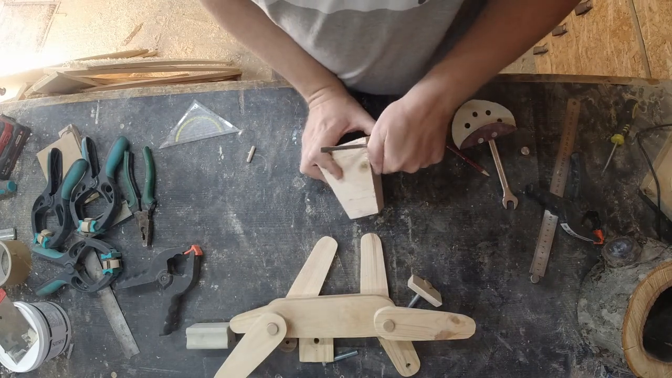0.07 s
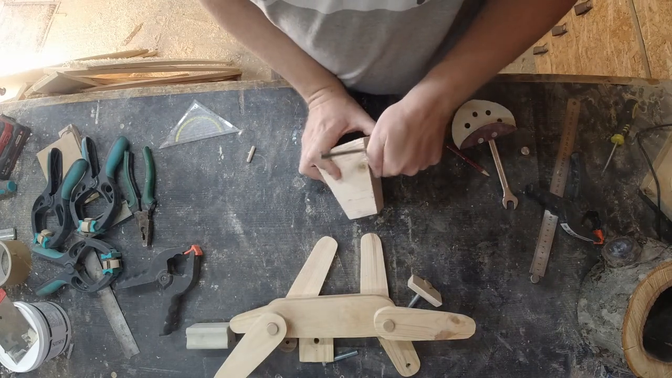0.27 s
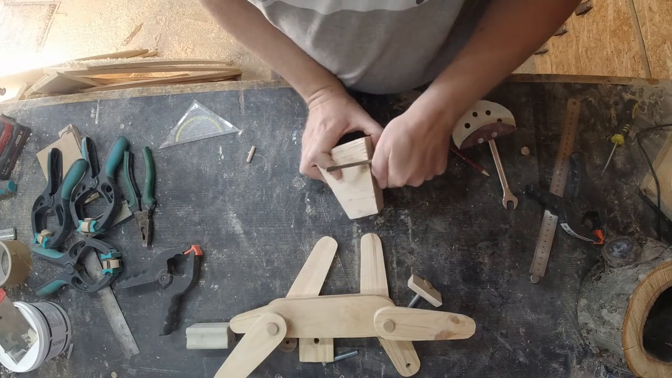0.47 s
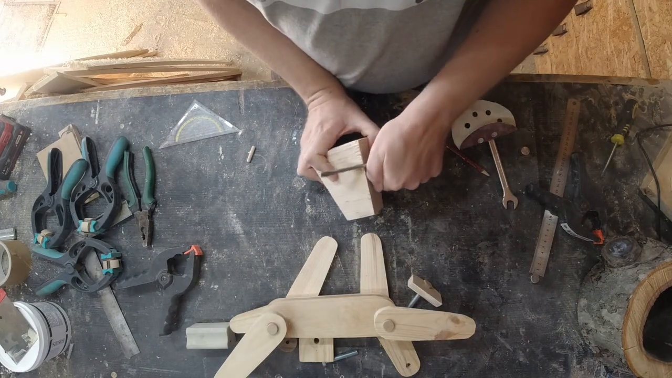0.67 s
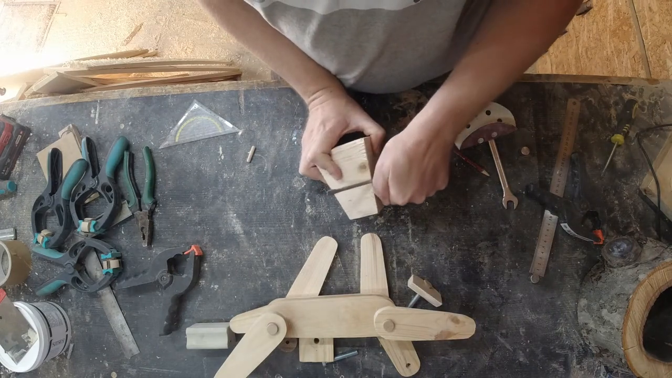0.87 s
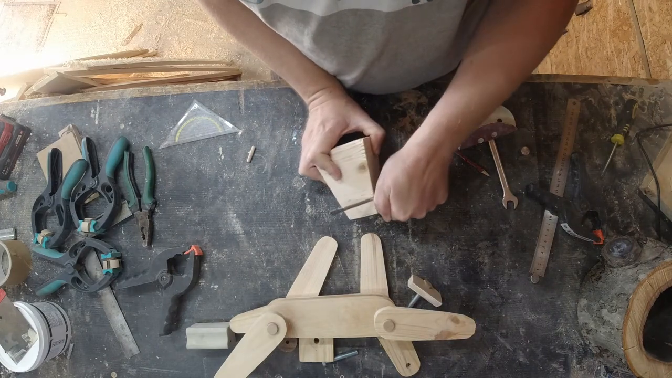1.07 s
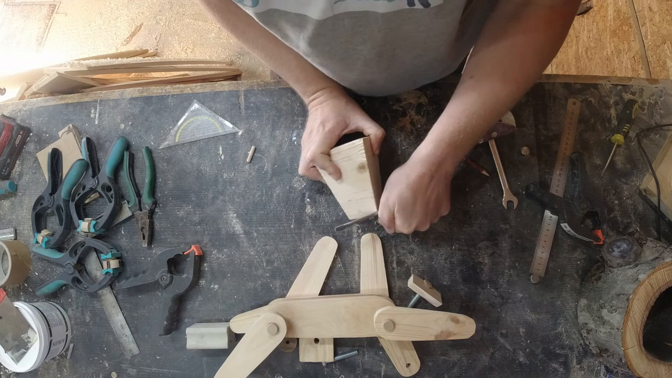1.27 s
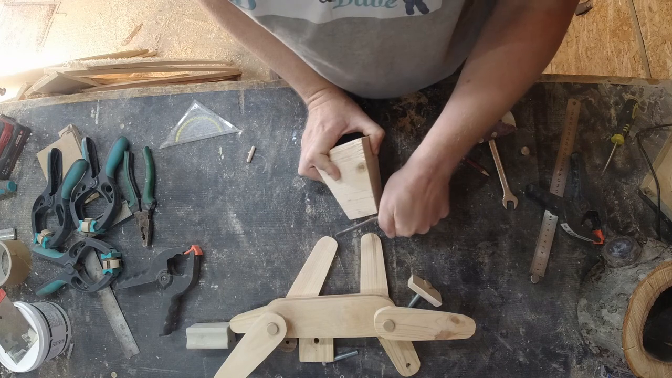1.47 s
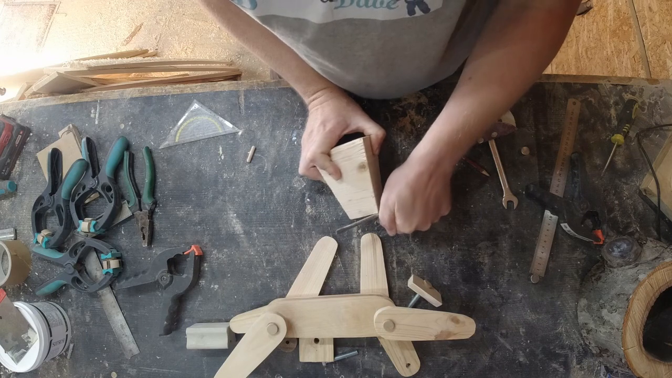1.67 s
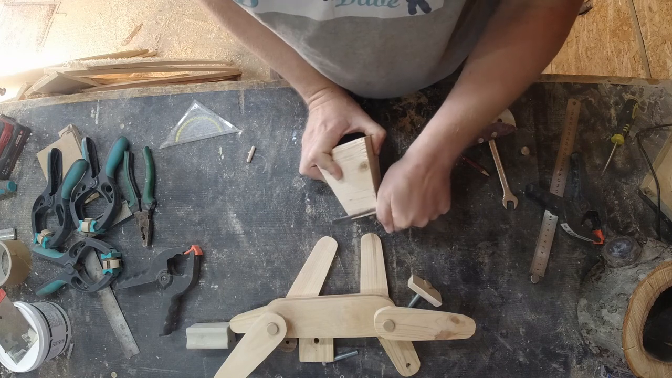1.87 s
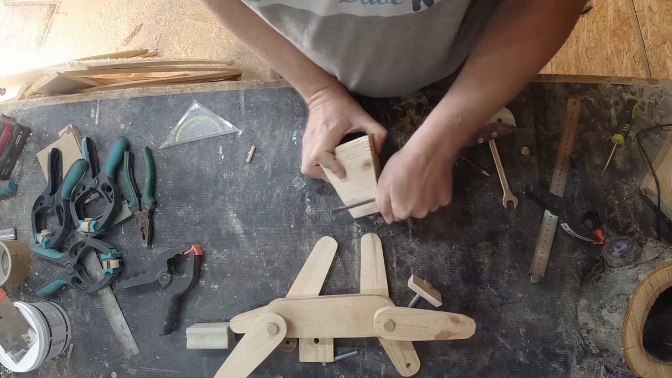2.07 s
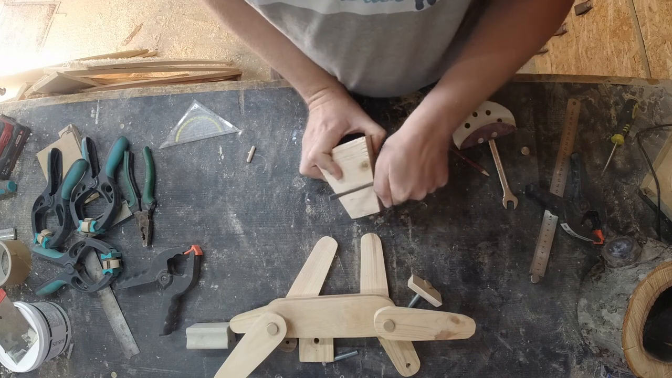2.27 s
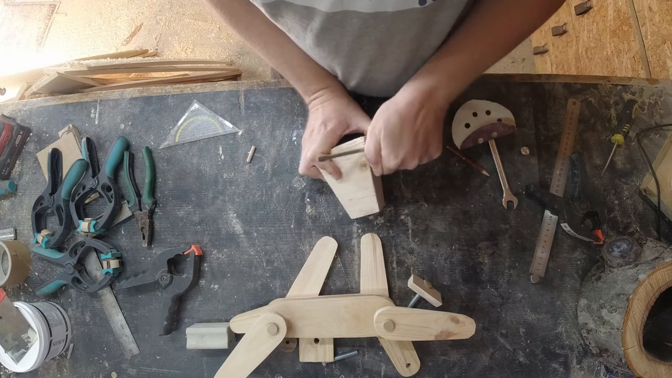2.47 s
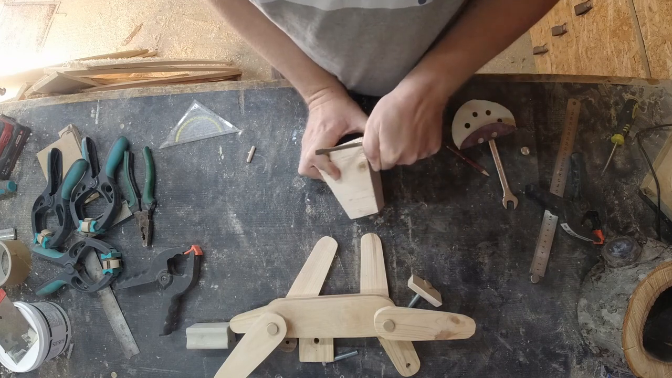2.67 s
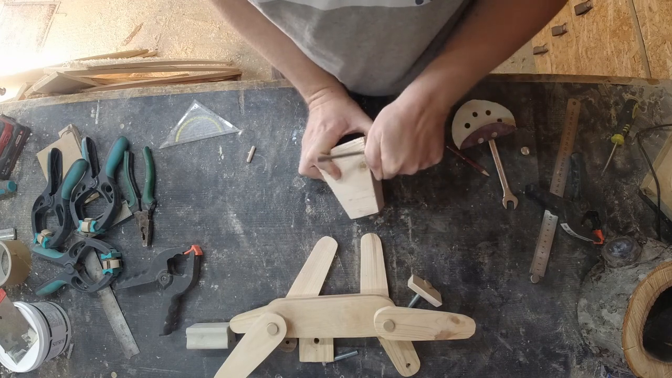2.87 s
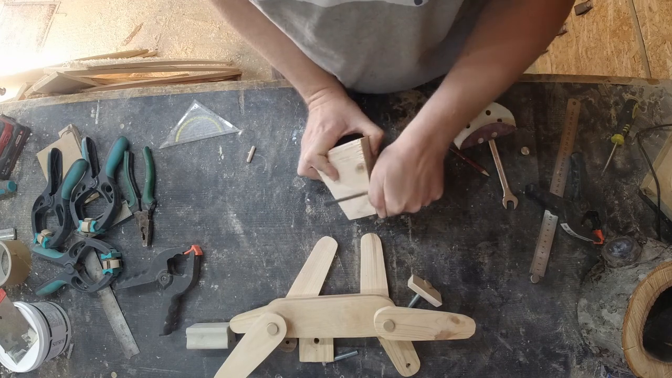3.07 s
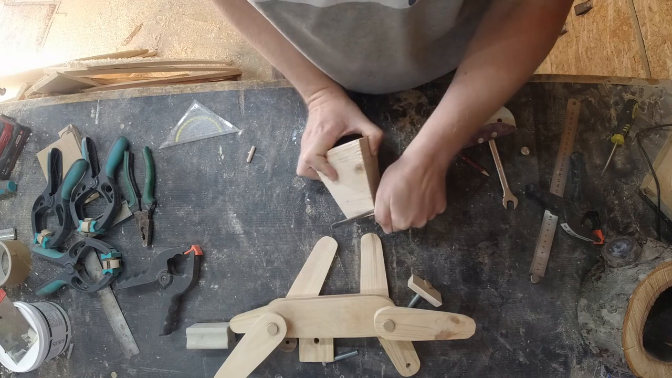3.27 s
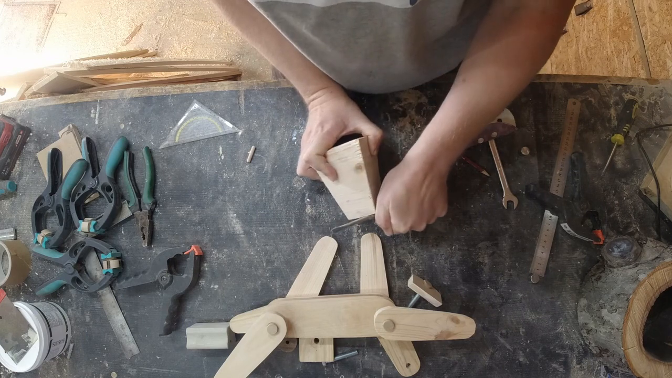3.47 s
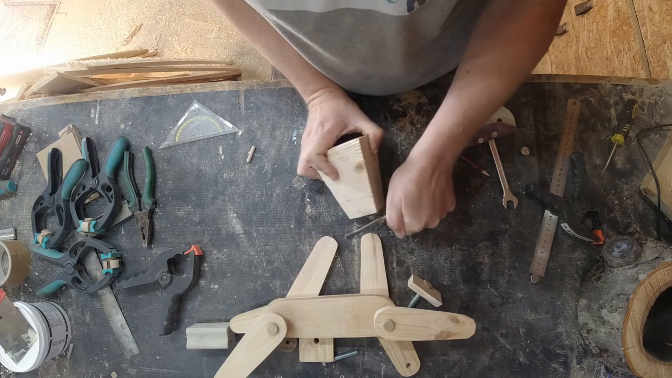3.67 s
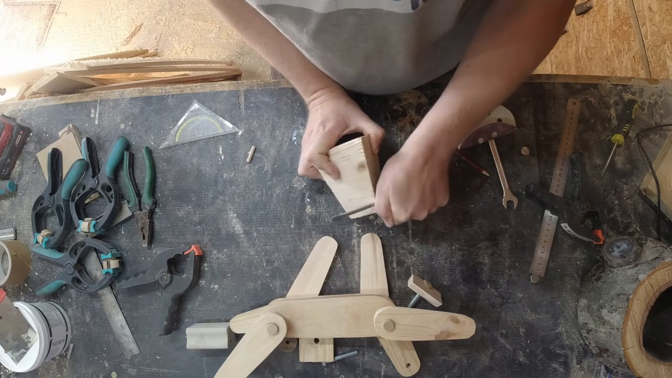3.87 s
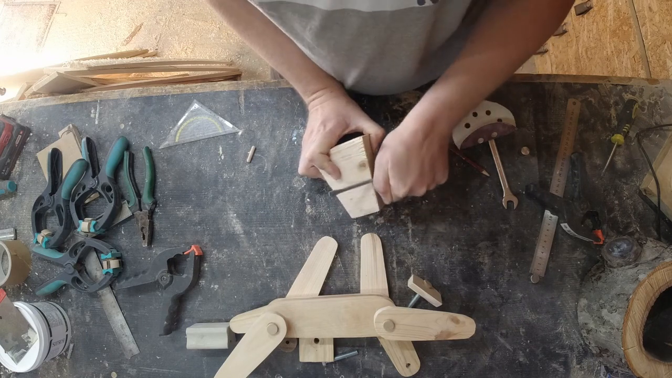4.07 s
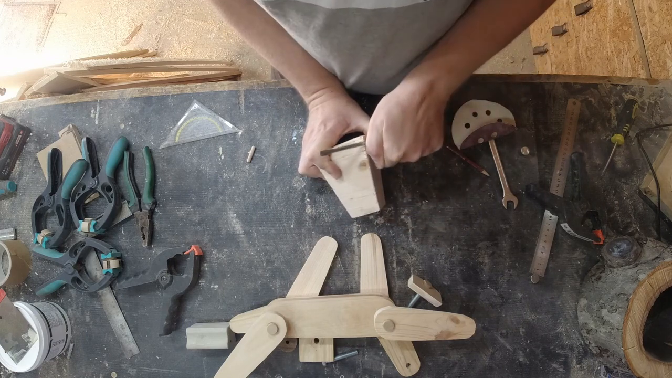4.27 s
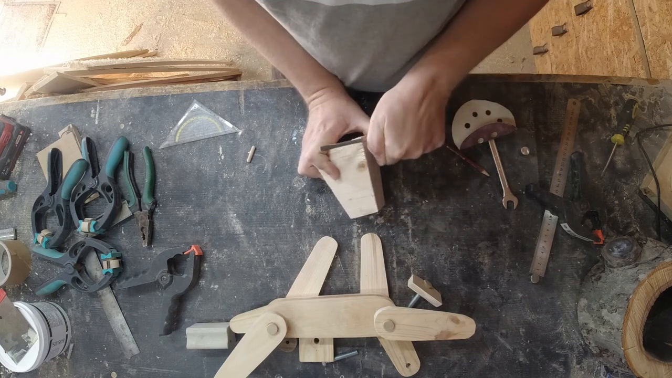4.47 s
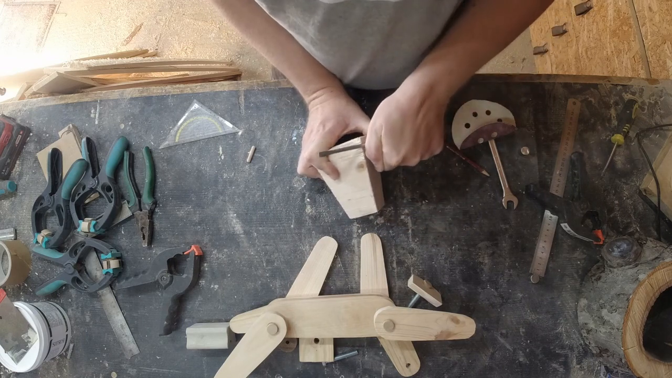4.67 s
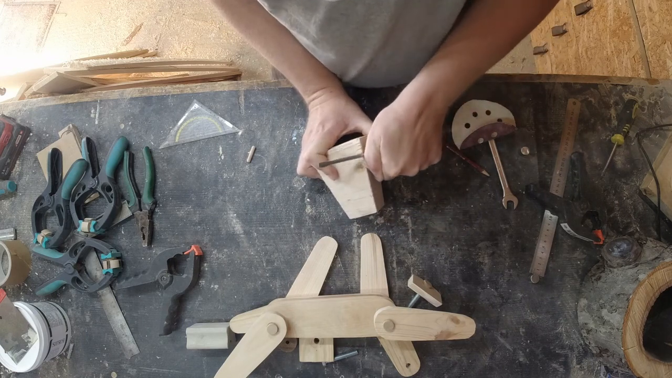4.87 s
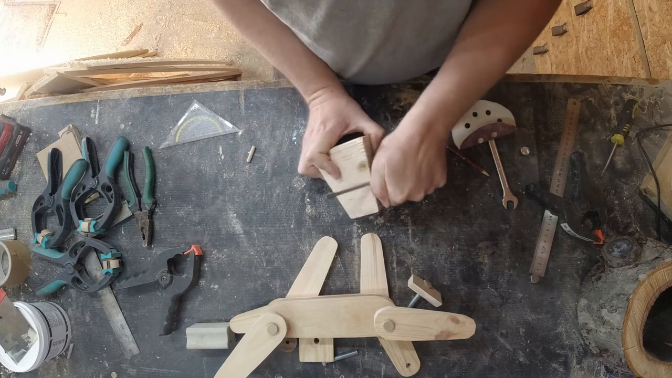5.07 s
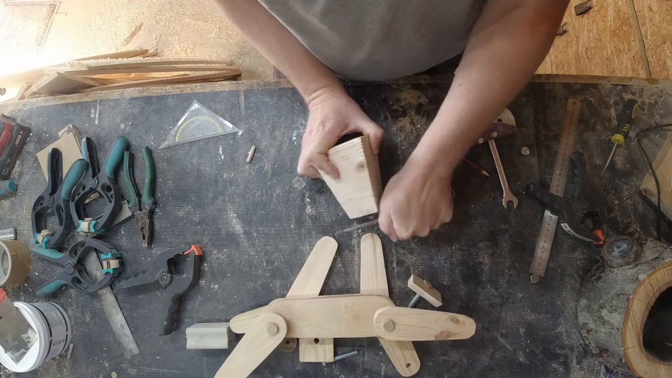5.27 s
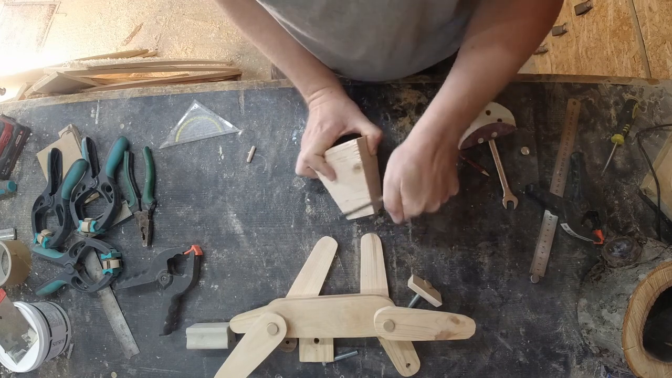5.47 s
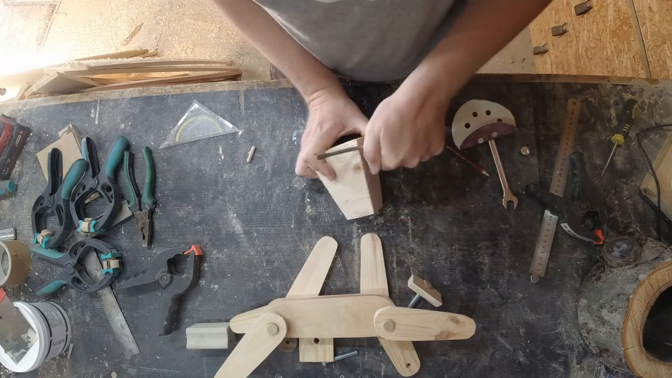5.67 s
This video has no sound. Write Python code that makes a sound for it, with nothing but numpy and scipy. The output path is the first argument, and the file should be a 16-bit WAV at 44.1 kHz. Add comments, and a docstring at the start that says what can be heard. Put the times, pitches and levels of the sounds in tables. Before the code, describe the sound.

In a small quiet workshop, a hand file scrapes a wooden block in brief, uneven rasps. The block knocks woodenly on the bench in irregular clusters, with low thuds beneath and three soft, deep bumps. A faint steel tap comes at the very end. Close microphone, nearly dry, work centred, soft room rumble and hiss behind.

```python
"""A small hand file works over a wooden block on a bench, close by, in a small quiet workshop.
From the start, uneven strokes rasp, hiss and judder as random cuts and catches excite block and bench.
Soon the block knocks on the bench top: bands of decaying modes and noise make knock, thud and tick.
From 1.5 s three soft fist bumps wake mostly low modes; from 2 s the blade sings thinly three times.
Near the end the steel file taps once and rings, with a dry rattle. Filtered noise is the room tone throughout."""
import sys
import numpy as np
from scipy import signal
from scipy.fft import rfft, irfft
from scipy.io import wavfile
from scipy.ndimage import uniform_filter1d

SR = 44100
rng = np.random.default_rng(int(sys.argv[2]) if len(sys.argv) > 2 else 0)


def digitize_waveform(pressure):
    """Quantize a signal to 16-bit integers and store it at the path in sys.argv[1].

    Rows of a 2-D input are taken as channels; values are limited to [-1, 1].
    """
    field = np.atleast_2d(pressure).T
    bounded = np.clip(field, -1, 1)
    quanta = np.round(bounded * 32767).astype(np.int16)
    wavfile.write(sys.argv[1], SR, quanta)


N = 252252
T = np.arange(N) / SR

# modes of the bench top and the block on it: f/Hz, relative height/dB, t60/s
BENCH_MODES = [(54.8, -7, 0.064), (70.1, -9, 0.46), (120.9, -1, 0.26), (155.3, -15.5, 0.049),
               (174.4, -12.5, 0.13), (196, -24.5, 0.11), (283.6, -9.5, 0.15), (385.8, -13, 0.12),
               (494.4, -23, 0.12), (539.4, -16.5, 0.061), (608, -26.5, 0.18), (666, -23, 0.16),
               (693, -24.5, 0.051), (853.5, -16.5, 0.11), (979.6, -23.5, 0.09), (1009, -30, 0.035),
               (1162, -22.5, 0.17), (1351, -27, 0.13), (1579, -36.5, 0.23), (2030, -25.5, 0.084),
               (2216, -26, 0.045), (2403, -27.5, 0.025), (2585, -26.5, 0.091), (2704, -19.5, 0.24),
               (3280, -36.5, 0.042), (4040, -42, 0.031)]


def filing():
    """Teeth cut in quick catches; each catch also shakes the block and rocks the bench top."""
    # file on the block: t/s, place (0 near end, 1 far end)
    place_points = [(.25, 0.15), (1.0, 0.71), (1.3, 1), (2.0, 1), (2.4, 0.55), (2.6, 0.13), (3.0, 0.04),
                    (3.3, 1), (3.6, 0.6), (4.0, 0.97), (4.3, 0.13), (4.55, 0.58), (5.0, 0.22), (5.3, 0.96)]
    # block resonances under the teeth: f/Hz, width/Hz, gain at near end/dB, gain at far end/dB
    block_resonances = [(2200, 120, -4.5, -14), (2670, 130, 11, -16.5), (3600, 220, -42, -1.5),
                        (4080, 1500, -17.5, -9.5)]
    # colour of the teeth on the wood: f/Hz, gain/dB
    rasp_colour = [(600, -20), (1100, -9), (1500, 2), (1900, 0), (2350, 3), (2850, 4), (3400, -1.5),
                   (3850, -12), (4250, 4.5), (4750, -5), (5200, -17.5), (5850, -12.5), (6800, -24.5),
                   (12000, -56.5)]
    # colour of the tearing fibres: f/Hz, gain/dB
    hiss_colour = [(3500, -33.5), (4300, 2.5), (5200, -1.5), (6000, -11), (6900, 1.5), (7900, 12.5),
                   (8700, 6), (9600, 13), (10800, 6.5), (11600, 0.5), (12600, -22.5)]
    contact_floor_db = -99.5

    rasp_db, hollow_db, hiss_db, judder_db, drag_db = effort()
    place = np.interp(T, *np.transpose(place_points)).clip(0, 1)
    speed = undb(0.37 * (rasp_db - rasp_db.max()))
    catches = grains(250 + 700 * speed, spread_db=5.0)

    # each catch lets go a short burst of cutting
    burst = np.sqrt(ring(catches ** 2, fade(0.088)).clip(0))
    bite = unit(1 + 2.1 * unit(burst))
    cuts = grains(2500 + 8000 * speed, spread_db=3.0) * bite

    wood = through_block(cuts, place, t60=0.054, direct=0.25)
    resonant = 0
    for hz, width_hz, near_db, far_db in block_resonances:
        gain_db = near_db + (far_db - near_db) * place
        resonant = resonant + undb(gain_db) * resonance(wood, hz, width_hz)
    contact = (undb(rasp_db) - undb(contact_floor_db)).clip(0)
    teeth = steady(colour(wood + resonant, rasp_colour), 0.075) * contact

    # hollow note of the block
    hollow_hz, hollow_width_hz = 902, 430
    note = resonance(resonance(cuts, hollow_hz, hollow_width_hz), hollow_hz, hollow_width_hz)
    hollow = steady(note, 0.072) * undb(hollow_db)

    # the finest cuts hiss far above the rasp
    fine_cuts = through_block(cuts, place, t60=0.0095, direct=0.079)
    fibres = steady(colour(fine_cuts, hiss_colour), 0.12) * undb(hiss_db)

    # the same catches shake the block and the top beneath it
    shaking = ring(catches, body(BENCH_MODES, scatter_db=4.0))
    slips = colour(shaking, [(130, -18.5), (200, 0), (290, -2.5), (500, 1),
                             (950, -2.5), (1500, 0.0), (3000, -13.0)])
    rocking = colour(shaking, [(22, -11.5), (42, 0.0), (70, 7.5), (120, -1.5),
                               (200, 2), (290, -0.5), (420, -11.5), (1000, -54.0)])
    judder = steady(slips, 0.012) * undb(judder_db)
    drag = steady(rocking, 0.068) * undb(drag_db)
    return teeth + hollow + fibres + singing_blade(cuts) + judder + drag


def singing_blade(cuts):
    """The cuts excite one narrow blade resonance, heard in Gaussian swells."""
    # t/s, 1/e half length/s, level/dB
    swells = [(2.048, 0.025, -63), (2.262, 0.036, -70), (3.282, 0.095, -80)]
    blade_hz, width_hz = 6020, 68
    level = sum(undb(db) * np.exp(-((T - at_s) / length_s) ** 2) for at_s, length_s, db in swells)
    return unit(resonance(resonance(cuts, blade_hz, width_hz), blade_hz, width_hz)) * level


def effort():
    """Levels in dB of rasp, hollow ring, hiss, judder and drag as the hand works through its strokes."""
    # strokes: start t/s, length/s, then relative levels/dB of
    # rasp of the teeth, hollow ring of the block, hiss of tearing fibres, drag on the bench
    strokes = [(0.183, 0.031, -54.5, -56.5, -93, -44), (0.455, 0.043, -50, -47, -80, -31),
               (0.522, 0.052, -56, -54, -100, -46.5), (0.866, .036, -56, -45.5, -59, -24.5),
               (1.041, 0.038, -54, -52.5, -78, -31), (1.18, 0.045, -50, -50.5, -65.5, -24),
               (1.254, .11, -54, -63, -69.5, -29.5), (1.461, .02, -62, -77, -112, -43.5),
               (2.027, 0.062, -56.5, -58.5, -71.5, -44.5), (2.167, 0.26, -60.5, -58.5, -110, -52),
               (2.258, 0.072, -54, -69, -73, -36), (2.353, 0.14, -56.5, -60.5, -105, -42),
               (2.492, 0.16, -54, -55, -68.5, -25), (2.653, .04, -55.5, -75, -90, -33),
               (2.78, 0.034, -72, -79, -103, -57.5), (3.002, 0.042, -55, -75, -92, -48.5),
               (3.045, 0.21, -56.5, -63, -67.5, -27), (3.206, 0.13, -54.5, -55.5, -65, -24.5),
               (3.554, 0.019, -61, -69, -112, -62), (3.591, 0.042, -57.5, -62, -84, -41.5),
               (3.728, .015, -59, -70, -112, -39), (3.929, 0.059, -63, -63, -104, -37.5),
               (4.014, 0.052, -56.5, -65, -102, -41), (4.124, 0.098, -55, -55.5, -74, -34.5),
               (4.247, 0.12, -54, -55.5, -64.5, -30.5), (4.373, 0.047, -52.5, -65, -82, -22),
               (4.481, 0.054, -60.5, -76, -80, -38.5), (4.626, 0.026, -68, -80, -108, -46.5),
               (4.735, 0.057, -78, -78.5, -103, -87.5), (5.01, 0.076, -57.5, -70, -75.5, -33.5),
               (5.202, 0.21, -59.5, -58, -64, -22.5), (5.44, 0.024, -67.5, -63, -75, -37)]
    starts_s, lengths_s, rasp_db, hollow_db, hiss_db, drag_db = np.transpose(strokes)
    # judder grows with drag, by 0.85 dB per dB
    firm_drag_db, firm_judder_db, judder_slope = -24.5, -44.5, 0.85
    judder_db = firm_judder_db + judder_slope * (drag_db - firm_drag_db)
    # the resting file never lies quite still
    rest_rasp_db, rest_judder_db, rest_drag_db = -87.22, -76.5, -74.5
    # shapes: attack dB/s, sag at both ends dB, release dB/s
    rasp_shape = (620, 2.3, 520)
    hiss_shape = (1200, 3.3, 510)
    judder_shape = (680, 2.85, 514)
    drag_shape = (1040, 3.2, 242)
    return 20 * np.log10([
        follow(starts_s, lengths_s, rasp_db - 0.22, rasp_shape) + undb(rest_rasp_db),
        follow(starts_s, lengths_s, hollow_db, rasp_shape),
        follow(starts_s, lengths_s, hiss_db, hiss_shape),
        follow(starts_s, lengths_s, judder_db, judder_shape) + undb(rest_judder_db),
        follow(starts_s, lengths_s, drag_db - 1.5, drag_shape) + undb(rest_drag_db)])


def follow(starts_s, lengths_s, levels_db, shape):
    """Gain of a layer over all strokes: each rises, arches gently and dies away; the loudest wins."""
    attack_db_per_s, sag_db, release_db_per_s = shape
    loudest_db = np.full(N, -200.)
    for start_s, length_s, db in zip(starts_s, lengths_s, levels_db):
        t = T - start_s
        arch_db = sag_db * (2 * (t / length_s).clip(0, 1) - 1) ** 2
        attack_db = attack_db_per_s * np.minimum(t, 0)
        release_db = release_db_per_s * np.maximum(t - length_s, 0)
        loudest_db = np.maximum(loudest_db, db - arch_db + attack_db - release_db)
    return undb(loudest_db)


def through_block(x, place, t60, direct, count=9):
    """Dense reflections in the block, crossfaded between count responses along its length."""
    shares = (np.sqrt((1 - abs(place * (count - 1) - k)).clip(0)) for k in range(count))
    return direct * x + sum(share * ring(x, tail(t60)) for share in shares)


def knocks():
    """The block drops on the bench: edge tick, woody knock, and a lower thud through the top."""
    # t/s, knock level/dB, relative level of the thud of the weight behind it/dB,
    # hardness as tick of the edge relative to the knock/dB
    drops = [(0.4517, -37, -38, -4), (0.4802, -28, -19.5, -8), (0.5607, -40, -37, -1),
             (0.8578, -17.5, -14, -19), (0.889, -24.5, -15, -2.5), (1.1822, -35, -17, -3),
             (1.2105, -22.5, -21, -43), (1.7859, -38.5, -39.5, -21.5), (2.313, -31.5, -24.5, -43.5),
             (2.529, -33.5, -25, 0.5), (2.58, -25.5, -22, -7), (2.6198, -20.5, -15.5, -42.5),
             (3.061, -24.5, -19, -18), (3.0914, -15, -13, -25.5), (3.116, -17, -15.5, -7),
             (3.6148, -39, -32, -3), (3.9236, -22, -29.5, -9), (4.1664, -30, -22.5, -18),
             (4.2953, -28, -20.5, -13), (4.3324, -24, -15, -8.5), (4.341, -22.5, -25, -22.5),
             (4.366, -28, -26.5, -14), (4.391, -25, -19, -28), (5.0067, -33.5, -17, -11.5),
             (5.0512, -21.5, -15.5, -22), (5.0944, -15.5, -12.5, -19.5), (5.198, -17.5, -32, -14.5),
             (5.2258, -21.5, -14, -14), (5.281, -19, -27, -31)]
    # a harder edge gives a higher knock; a stronger knock a higher thud
    even_knock_hz, tick_db_per_octave = 723, 36
    firm_thud_hz, firm_knock_db, knock_db_per_octave = 106.8, -21.5, 30
    out = np.zeros(N)
    for at_s, knock_db, thud_db, edge_db in drops:
        tick_db = knock_db + edge_db
        knock_hz = even_knock_hz * 2 ** (edge_db / tick_db_per_octave)
        thud_hz = firm_thud_hz * 2 ** ((knock_db - firm_knock_db) / knock_db_per_octave)
        wood = body(BENCH_MODES, scatter_db=4.0)
        knock = peak(band(wood, 0.53 * knock_hz, 1.76 * knock_hz), knock_db)
        crack = peak(band(tail(0.035), 1.25 * knock_hz, 2.53 * knock_hz, order=3), knock_db - 11.5)
        clatter = peak(band(tail(0.29), 270, 616), knock_db - 13.0)
        thud = peak(band(wood, 0.61 * thud_hz, 1.394 * thud_hz), thud_db - 1.0)
        tick = peak(band(wood, 1600, 3320, order=3), tick_db - 1.5)
        tick_noise = peak(band(tail(0.025), 1400, 3400, order=4), tick_db - 8.5)
        add(out, at_s, knock + crack + clatter + thud + tick + tick_noise)
    return out


def bumps():
    """A soft fist blow wakes mostly the lowest modes, and the bench shudders on for a moment."""
    # t/s, thud peak level/dB
    blows = [(1.519, -25.5), (3.636, -25), (5.437, -13)]
    thud_hz = 59.7
    out = np.zeros(N)
    for at_s, db in blows:
        wood = body(BENCH_MODES, scatter_db=2.0)
        thud = peak(band(wood, 0.54 * thud_hz, 1.46 * thud_hz), db)
        knock = peak(band(wood, 180, 710), db - 19)
        shudder = peak(band(tail(0.71), 40, 110), db - 15)
        add(out, at_s, thud + knock + shudder)
    return out


def tap():
    """The steel file touches something once: a noise tick, a faint modal ring and a dry rattle."""
    # modes of the steel file: f/Hz, relative height/dB, t60/s
    steel_modes = [(1487, 10, 0.11), (2060, 2, 0.096), (2200, -3, 0.12), (2650, -1, 0.18), (3150, 11, 0.4),
                   (3620, -7, 0.19), (4470, -28, .1)]
    out = np.zeros(N)
    touch = peak(band(tail(0.0094), 1300, 3600, order=4), -53.0)
    rattle = peak(band(tail(0.31), 1230, 2100), -53.0)
    steel = peak(body(steel_modes, scatter_db=5.0), -51.5)
    add(out, 5.6546, touch + rattle + steel)
    return out


def shop():
    """Quiet room tone: a shared rumble under a faint noise hiss that differs left and right."""
    # room tone spectrum: f/Hz, relative density/dB per Hz
    room_spectrum = [(15, -21.5), (25, 23.5), (78, 4), (451, -21), (756, -21.5), (1010, -23.5), (1300, -22),
                     (1440, -24), (1770, -23), (1920, -26.5), (2900, -26.5), (3470, -31.5), (12000, -52.5),
                     (15600, -76.5), (22000, -120)]
    mid, side = (unit(colour(rng.standard_normal(N), room_spectrum)) for _ in range(2))
    side = colour(side, [(60, -18.0), (110, -20), (220, -3), (600, 0.5), (4000, 0.0)])
    return undb(-58.5) * np.array([mid + side, mid - side])


def undb(db):
    """Decibels to gain."""
    return 10 ** (np.asarray(db) / 20)


def unit(x):
    """Scale to rms 1."""
    return x / np.sqrt(np.mean(x ** 2))


def peak(x, db):
    """Scale to a peak level."""
    return x * undb(db) / np.abs(x).max()


def steady(x, span_s):
    """Even out the slow swell of a random vibration by its running rms."""
    return x / np.sqrt(uniform_filter1d(x ** 2, int(span_s * SR) + 1) + 1e-12)


def add(track, at_s, sound):
    """Mix a sound into a track at a time."""
    start = max(int(at_s * SR), 0)
    track[start:start + len(sound)] += sound[:N - start]


def grains(rate_hz, spread_db):
    """Random tiny impulses of uneven size and either sign, rms 1 overall."""
    hit = rng.random(N) < rate_hz / SR
    size = undb(spread_db * np.minimum(rng.exponential(size=N), 4))
    return unit(hit * size * rng.choice([-1, 1], N) / np.sqrt(rate_hz))


def fade(t60):
    """Half a second of exponential decay, 60 dB in t60 seconds."""
    return np.exp(-np.log(1000) * T[:SR // 2] / t60)


def tail(t60):
    """A dense cloud of decaying reflections with unit energy."""
    cloud = rng.standard_normal(SR // 2) * fade(t60)
    return cloud / np.linalg.norm(cloud)


def body(modes, scatter_db):
    """Impulse response of decaying modes, their shares scattered as by the point of contact."""
    shares_db = scatter_db * rng.standard_normal(len(modes))
    response = 0
    for share_db, (hz, db, t60) in zip(shares_db, modes):
        # 1/t60 keeps the resonance height independent of the decay
        response = response + undb(db + share_db) / t60 * fade(t60) * np.sin(2 * np.pi * hz * T[:SR // 2])
    return response


def ring(x, response):
    """Pass a signal through an impulse response."""
    return signal.fftconvolve(x, response)[:N]


def band(x, low_hz, high_hz, order=2):
    """Butterworth band-pass."""
    edges_hz = [low_hz, min(high_hz, SR / 2 - 1)]
    return signal.sosfilt(signal.butter(order, edges_hz, "band", fs=SR, output="sos"), x)


def resonance(x, hz, width_hz):
    """A single resonance with gain close to 1 at its centre."""
    return band(x, hz - width_hz / 2, hz + width_hz / 2, order=1)


def colour(x, points):
    """Minimum-phase filter with the given (Hz, dB) outline, by folding the cepstrum."""
    hz, db = np.transpose(points)
    f = np.fft.rfftfreq(4096, 1 / SR)
    cepstrum = irfft(np.log(undb(np.interp(np.log(f + 1), np.log(hz), db))))
    fold = np.r_[1, np.full(len(f) - 2, 2), 1, np.zeros(len(f) - 2)]
    response = irfft(np.exp(rfft(cepstrum * fold)))
    return signal.fftconvolve(x, response)[:len(x)]


def scene():
    """The work is straight ahead; the bench top and walls spread its treble sideways."""
    # sideways reflections: f/Hz, gain/dB
    side_colour = [(60, -18.5), (110, -19.5), (200, -20.5), (350, -23.5), (630, -18.5), (1140, -11.5),
                   (2060, -10.5), (3720, 0), (6700, -8), (12100, -35)]
    work = filing() + knocks() + bumps() + tap()
    mid = work + undb(-21.5) * band(ring(work, tail(0.19)), 270, 7000)
    # long waves reach both sides nearly alike
    side = colour(band(ring(work, tail(0.045)), 260, 14000, order=1), side_colour)
    return np.array([mid + side, mid - side]) + shop()


def record(dry):
    """The microphone loses the deepest rumble and the top is cut."""
    low_cut = signal.butter(4, 32, "high", fs=SR, output="sos")
    top_cut = signal.ellip(8, .2, 70, 12650, fs=SR, output="sos")
    return signal.sosfilt(top_cut, signal.sosfilt(low_cut, dry))


dry = scene()
out = record(dry)
digitize_waveform(out)
```